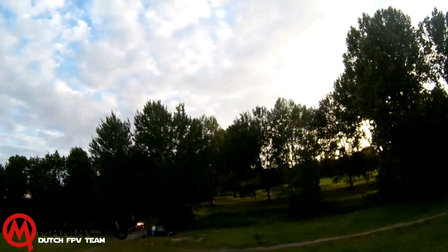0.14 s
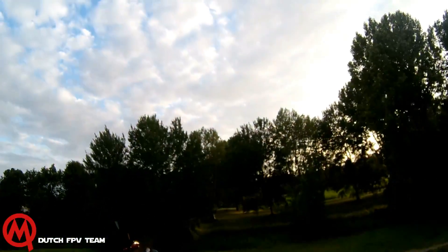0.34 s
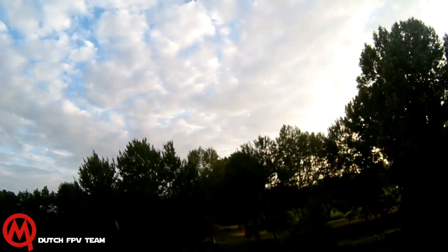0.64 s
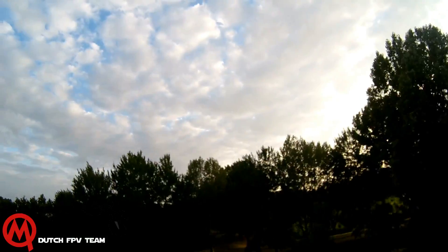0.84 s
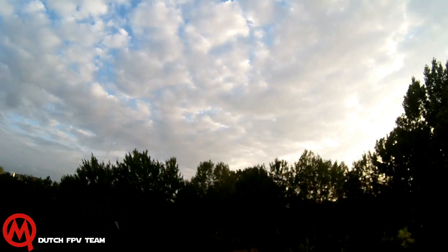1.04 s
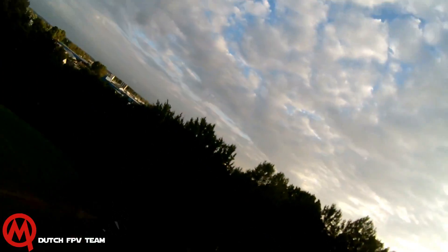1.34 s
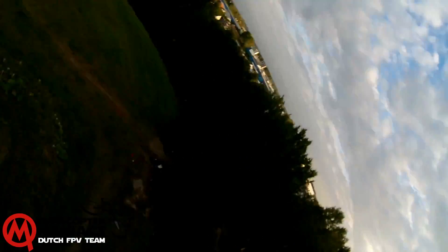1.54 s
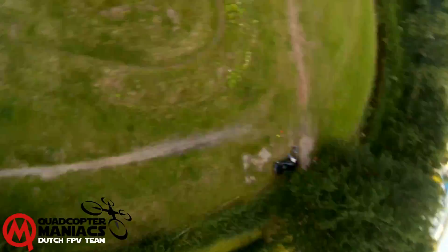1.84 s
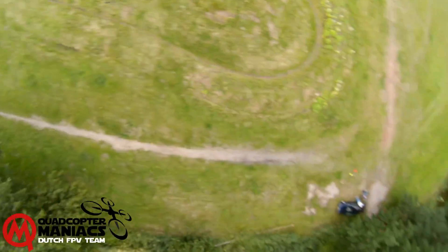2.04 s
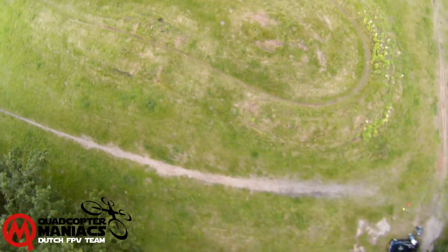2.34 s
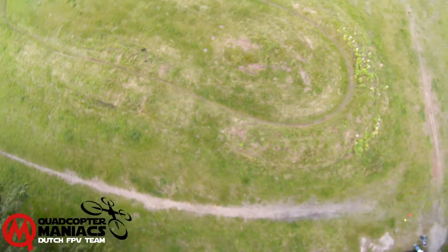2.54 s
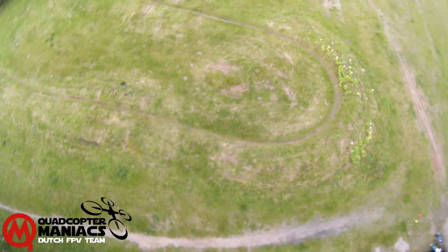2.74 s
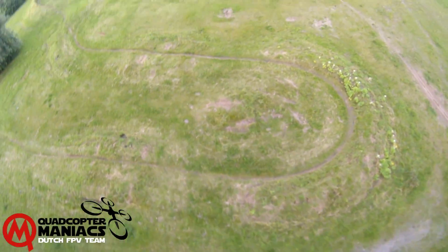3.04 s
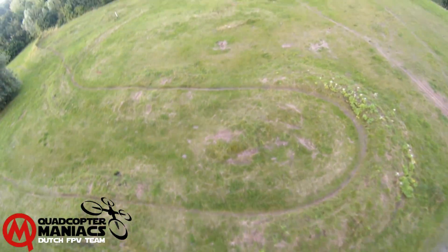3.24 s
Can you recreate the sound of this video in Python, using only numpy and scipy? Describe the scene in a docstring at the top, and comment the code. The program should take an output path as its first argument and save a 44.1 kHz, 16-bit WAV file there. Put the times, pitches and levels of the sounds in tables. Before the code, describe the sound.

Several drone propellers whine roughly with heavy air rush and low rumble, fall sharply in pitch and level during a roll and dive, crackle slightly, then spin up again; close, overloaded, dull-sounding microphone on the craft.

```python
"""Racing quadcopter, heard on board

Full throttle, a cut for a roll and a dive, then throttle again, heard from the craft's own camera.
Three propellers whine as harmonic tones at their own blade rates, over noise chopped by the blades.
Slaps and clicks crackle during the roll; low noise gives the rumble of the overloaded input at high throttle.
The sum is softly clipped, then passed through a narrow-band recorder."""
import sys
import numpy as np
from scipy.fft import rfft, irfft, next_fast_len
from scipy.io import wavfile
from scipy.ndimage import map_coordinates

SR = 44100
rng = np.random.default_rng(int(sys.argv[2]) if len(sys.argv) > 2 else 0)


def dump(signal):
    """Clip the signal to [-1, 1] and save it as 16-bit WAV at the path in sys.argv[1]."""
    limited = np.clip(np.atleast_2d(signal).T, -1, 1)
    pcm = np.round(limited * 32767).astype(np.int16)
    wavfile.write(sys.argv[1], SR, pcm)


N = 149940

# blade-passing rate of the lead propeller: time_s, pitch_hz
LEAD_PITCH = [(0, 903), (.3, 909), (.54, 896), (.65, 908), (.82, 915), (1.04, 880), (1.15, 770), (1.2, 650),
              (1.265, 560), (1.36, 245), (1.5, 295), (1.63, 364), (1.69, 318), (1.77, 355), (1.86, 308),
              (1.92, 346), (2.02, 295), (2.08, 308), (2.24, 283), (2.31, 305), (2.47, 250), (2.62, 262),
              (2.77, 308), (2.92, 306), (3.1, 395), (3.18, 480), (3.4, 568)]
# low rumble of the overloaded input, strong at high throttle: time_s, level_db
OVERLOAD_RUMBLE_LEVEL = [(0, -16), (1.262, -18.5), (1.285, -69), (3.155, -71.5), (3.178, -13.5),
                         (3.4, -17.5)]
# colour of the rush of air before it is scaled to rms 1: frequency_hz, density_db_per_hz
AIR_COLOUR = [(25, -46), (90, -22.5), (150, -10), (220, -1.5), (400, 1), (1000, -1), (1450, -3), (2000, -9),
              (2700, -13), (3300, -19), (4300, -25), (6200, -27.5), (12000, -40.5)]
FULL_HZ = 850  # reference blade rate for full throttle


def amp(db):
    """Decibels to gain."""
    return 10 ** (np.asarray(db) / 20)


def unit(x):
    """Scaled to rms 1."""
    return x / np.sqrt(np.mean(x ** 2) + 1e-20)


def curve(rows):
    """(time_s, value) points as one value per sample."""
    return np.interp(np.arange(N) / SR, *np.transpose(rows))


def colour(points):
    """Gain against frequency from (frequency_hz, level_db) points on a log axis."""
    f, db = np.transpose(points)
    return lambda hz: amp(np.interp(np.log(hz + 1), np.log(f + 1), db))


def wobble(rate):
    """A smooth random curve, rate knots a second."""
    knots = rng.standard_normal(int(N * rate / SR) + 4)
    return map_coordinates(knots, [np.arange(N) * rate / SR])


def filtered(x, response):
    """x times a response of frequency."""
    m = next_fast_len(N + SR // 2)
    spectrum = rfft(x, m) * response(np.fft.rfftfreq(m, 1 / SR))
    return irfft(spectrum, m)[..., :N]


def noise(points, envelope=1):
    """Coloured noise of rms 1, modulated before it is coloured."""
    return unit(filtered(envelope * rng.standard_normal(N), colour(points)))


def swell(s, db, length):
    """A bell-shaped envelope around time s."""
    return amp(db) * np.exp(-.5 * ((np.arange(N) / SR - s) / length) ** 2)


def hiss():
    """A short bell-shaped burst of treble noise as the motors pick up."""
    # centre_s, level_db, length_s
    burst = (3.057, -30.5, .012)
    # frequency_hz, density_db_per_hz
    hiss_colour = [(900, -20), (2300, 0), (4500, -9), (9000, -22)]
    return swell(*burst) * noise(hiss_colour)


def overload_rumble():
    """Low coloured noise for the rumble of the overloaded input at high throttle."""
    # frequency_hz, density_db_per_hz
    rumble_colour = [(15, -3.5), (145, 1), (220, -2), (400, -17.5), (800, -13), (3000, -48)]
    return amp(curve(OVERLOAD_RUMBLE_LEVEL)) * noise(rumble_colour)


def slaps():
    """Turbulent air slaps the frame: brief bell-shaped bursts of noise."""
    # centre_s, level_db, length_s
    slap_events = [(1.782, -22, .003), (1.8695, -21, .002), (1.879, -21, .0025), (2.278, -31, .006),
                   (2.955, -27, .008)]
    # frequency_hz, density_db_per_hz
    slap_colour = [(100, -14), (500, 17), (1500, 12), (7000, -30.5)]
    return sum(swell(*row) for row in slap_events) * noise(slap_colour)


def click(s, db, length):
    """One quick push and pull of pressure, its peaks one length either side of time s."""
    u = (np.arange(N) / SR - s) / length
    return amp(db) * u * np.exp(1 - np.abs(u))


def clicks():
    """Sharp, dry clicks on the frame, each one pressure pulse."""
    # centre_s, peak_db, length_s
    click_events = [(1.8705, -15, 1.6e-4), (1.879, -14.5, 2.3e-4), (1.8998, -19, 1.3e-4),
                    (1.9503, -14, 1.7e-4), (1.9527, -13, 9e-5)]
    return sum(click(*row) for row in click_events)


def rush(phases, beat):
    """Coloured noise chopped by all the blades; a body and a rougher fizz swirl separately."""
    # time_s, level_db
    rush_level = [(0, -9.5), (1.0, -9), (1.23, -11.5), (1.28, -20.5), (1.37, -27.5), (1.44, -29),
                  (1.62, -25.5), (1.77, -26), (1.82, -29.5), (1.98, -29.5), (2.055, -34), (2.1, -31),
                  (2.28, -32.5), (2.4, -33.5), (2.6, -31.5), (2.8, -29.5), (3.02, -24.5), (3.14, -19),
                  (3.21, -12), (3.4, -9.5)]
    chop_depth, throb_db, gust_db = 0.35, 3, 1.5
    swirl_rate, body_swirl_db, fizz_swirl_db = 220, 0.43, 1.5  # knots per second, dB, dB
    fizz_hz = 2400  # crossover from body to fizz
    speed = curve(LEAD_PITCH) / FULL_HZ
    blades = np.exp(chop_depth * np.cos(phases).sum(axis=0) / 2)
    # the throb deepens with speed, the gusts as the propeller slows
    chop = blades * amp(throb_db * beat * speed + gust_db * (1 - speed) * wobble(60))

    def high(hz):
        """Share of the power that goes to the fizz."""
        return 1 / (1 + (fizz_hz / (hz + 1)) ** 8)

    body = noise(AIR_COLOUR, chop * amp(body_swirl_db * wobble(swirl_rate)))
    fizz = noise(AIR_COLOUR, chop * amp(fizz_swirl_db * wobble(swirl_rate)))
    body = filtered(body, lambda hz: np.sqrt(1 - high(hz)))
    fizz = filtered(fizz, lambda hz: np.sqrt(high(hz)))
    return amp(curve(rush_level)) * (body + fizz)


def throb(beat):
    """The low tone at the difference of the lead and trail blade rates, following the rumble."""
    return amp(curve(OVERLOAD_RUMBLE_LEVEL) - 9.5) * beat


def propeller(track, levels, surge):
    """Partials of an unsteady blade rate, with the phase of the blades."""
    # disturbed air in the roll and the pull-out roughens and brightens the tones: time_s, share_0_to_1
    wake_share = [(1.45, 0), (1.8, .7), (2.05, .2), (3.15, .1), (3.27, 1)]
    # pitch deviations as shares of the blade rate, and their knots per second
    waver, waver_rate = 0.00203, 30
    flutter, wake_flutter, flutter_rate = 0.00495, .028, 170
    unsteady_power = 1.5  # how steeply waver and flutter grow as the propeller slows
    slow_dull_db = 5.5  # per octave of slowness and per partial step
    frame_hz, frame_width_hz, frame_db = 1270, 230, 3.5  # a broad frame resonance lifts the partials
    flicker_db = 1.4
    hz, wake = curve(track), curve(wake_share)
    slowness = FULL_HZ / hz  # a slow propeller is more easily disturbed, and duller
    unsteady = waver * wobble(waver_rate) + flutter * wobble(flutter_rate)
    unsteady = slowness ** unsteady_power * unsteady + wake_flutter * wake * wobble(flutter_rate)
    phase = 2 * np.pi * np.cumsum(hz * (1 + unsteady)) / SR + rng.uniform(0, 2 * np.pi)
    tone = 0
    for k, db in enumerate(levels, 1):
        dull = slow_dull_db * np.log2(slowness) * min(k - 1, 2) * (1 - wake / 2)
        frame = frame_db * np.exp(-((k * hz - frame_hz) / frame_width_hz) ** 2)
        flicker = flicker_db * (wobble(45) + wake * wobble(flutter_rate))
        gain = amp(db - dull + frame + flicker)
        if k == 1:
            gain = gain * surge
        tone = tone + gain * np.sin(k * phase)
    return np.sqrt(2) * tone, phase


def propellers():
    """The mixed whine of three propellers at separate blade rates, with their blade phases."""
    # blade-passing rates of the other two propellers: time_s, pitch_hz
    trail_pitch, steer_pitch = [(0, 767), (.35, 762), (1.02, 763), (1.14, 632), (1.2, 578), (1.27, 425),
                                (1.31, 372), (1.36, 237), (1.43, 237), (1.49, 213), (1.56, 220),
                                (1.69, 176), (1.9, 205), (2.08, 254), (2.55, 246), (2.7, 292), (2.94, 318),
                                (3.06, 385), (3.24, 402), (3.4, 490)], [(0, 893), (.45, 872), (.75, 884), (1.0, 850), (1.15, 740),
                                               (1.25, 570), (1.37, 255), (1.48, 570), (1.67, 635),
                                               (1.78, 480), (1.97, 325), (2.36, 275), (2.44, 312),
                                               (2.58, 278), (2.9, 325), (3.04, 395), (3.2, 590),
                                               (3.38, 660)]
    # partials at 1, 2, 3 times each blade rate: level_db
    lead_partials, trail_partials = [-0.5, -8, -11], [-1, -1.5, -12]
    steer_partials = [-3, -10, -8]
    # loudness of the whole whine: time_s, level_db
    whine_level = [(0, -19.8), (1.04, -20), (1.17, -19), (1.23, -16), (1.29, -17.5), (1.37, -33),
                   (1.6, -31.5), (1.8, -34.5), (1.94, -32), (2.03, -38.5), (2.6, -34), (2.8, -26.5),
                   (2.97, -26), (3.2, -16), (3.4, -17)]
    # gain of the other two propellers in the mix: time_s, level_db
    trail_share, steer_share = [(1.0, 1), (1.21, -6.5), (1.33, 2), (2.1, -4), (3.0, -0.5), (3.3, -9.5)], [(1.3, -6.5), (1.8, 2), (2.5, 0.5), (3.0, -7.5),
                                                     (3.3, -2)]
    # moments when all the fundamentals surge together: centre_s
    surge_times = [.02, .15, .345, .435, .525, .552, .635, .665, .7, .762, .843, .93, .99, 1.027, 1.213,
                   1.238, 1.26]
    # each surge adds a bell of 3.5 dB peak gain, .0085 s long, to the steady gain of 1
    surge = 1 + sum(swell(s, 3.5, .0085) for s in surge_times)
    lead, lead_phase = propeller(LEAD_PITCH, lead_partials, surge)
    trail, trail_phase = propeller(trail_pitch, trail_partials, surge)
    steer, steer_phase = propeller(steer_pitch, steer_partials, surge)
    whine = lead + amp(curve(trail_share)) * trail + amp(curve(steer_share)) * steer
    return amp(curve(whine_level)) * whine, (lead_phase, trail_phase, steer_phase)


def scene():
    """Everything summed at the one microphone on the frame."""
    whine, phases = propellers()
    beat = np.cos(phases[0] - phases[1])  # lead against trail
    air = rush(phases, beat)
    low_end = throb(beat) + overload_rumble()
    return (hiss() + slaps() + clicks() + low_end + air + whine)[None]


def record(dry):
    """The input overloads softly; the recorder has a narrow notch and little treble."""
    # response of the recorder: frequency_hz, gain_db
    recorder = [(4400, 0), (5000, -5), (5600, -12), (6150, -19), (6500, -42), (6900, -25), (8500, -20),
                (13000, -32)]
    clip_top, clip_knee = 0.73, 5  # ceiling in full scale, sharpness of the bend
    notch_hz, notch_width_hz, top_hz = 704, 24, 15700
    clipped = dry / (1 + np.abs(dry / clip_top) ** clip_knee) ** (1 / clip_knee)

    def response(hz):
        """Notch, treble roll-off and upper limit together."""
        offset = notch_hz ** 2 - hz ** 2
        notch = offset / (offset + 1j * hz * notch_width_hz)
        return notch * colour(recorder)(hz) * (hz < top_hz)

    return filtered(clipped, response)


dry = scene()
out = record(dry)
dump(out)
```